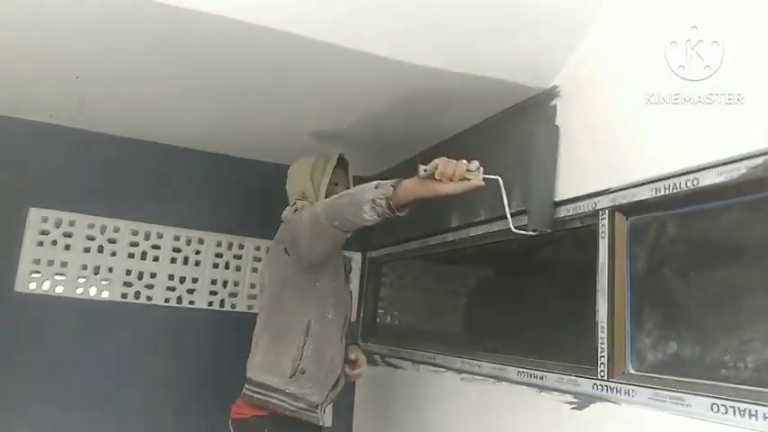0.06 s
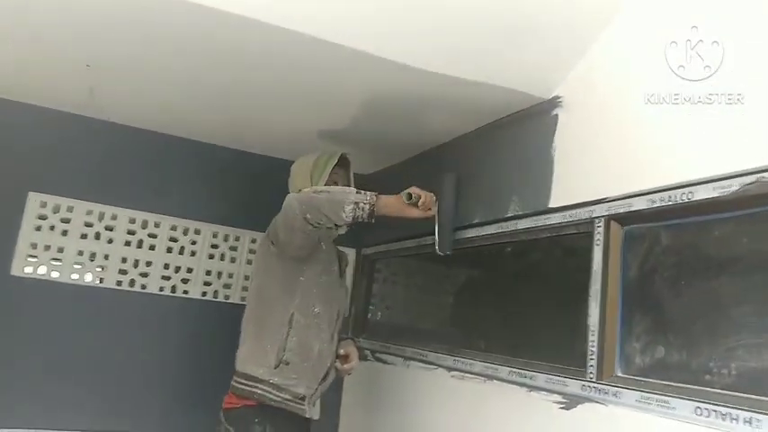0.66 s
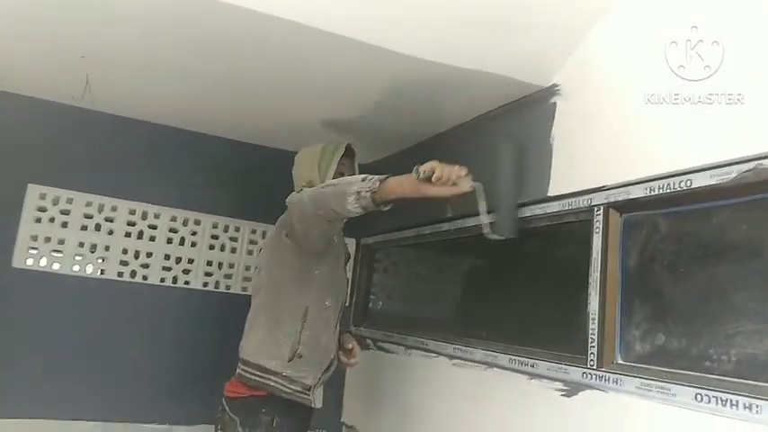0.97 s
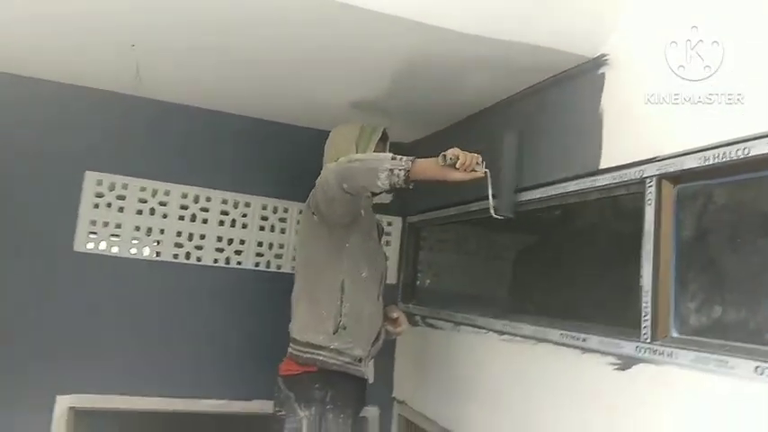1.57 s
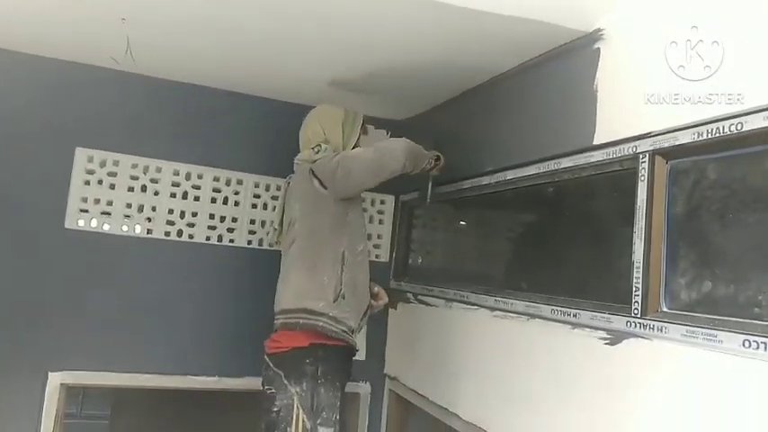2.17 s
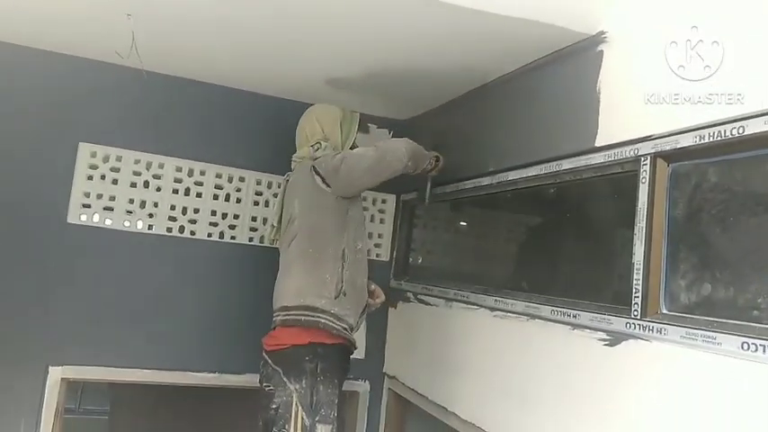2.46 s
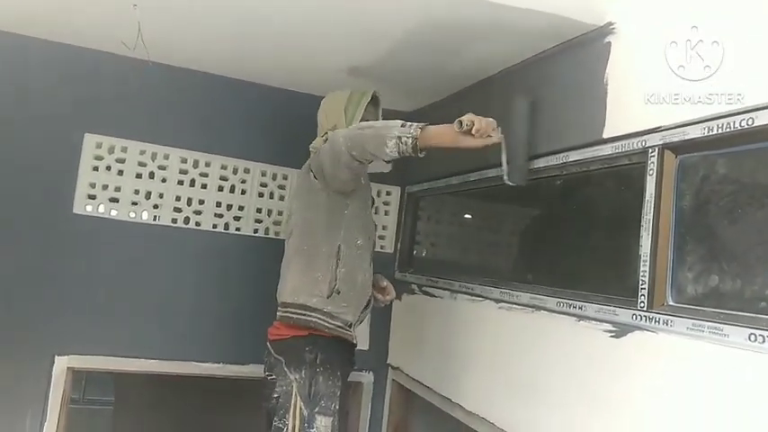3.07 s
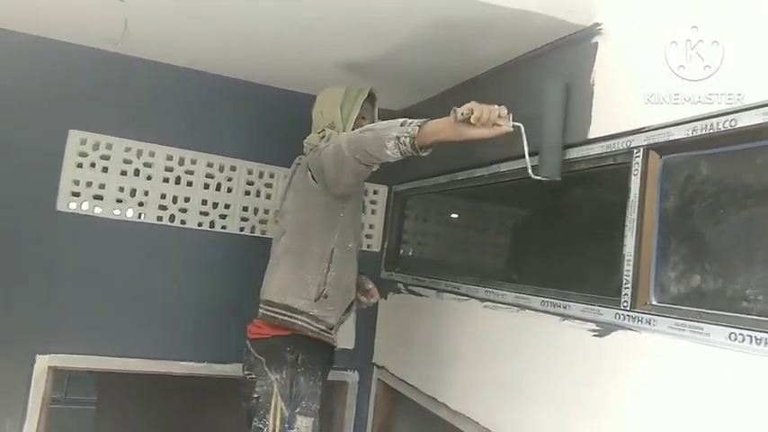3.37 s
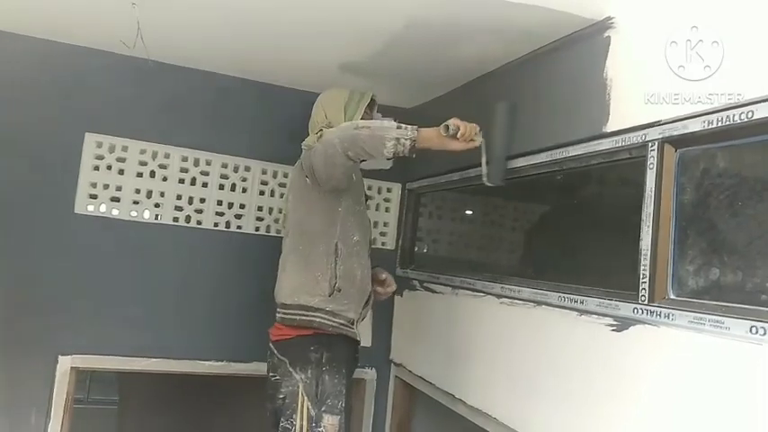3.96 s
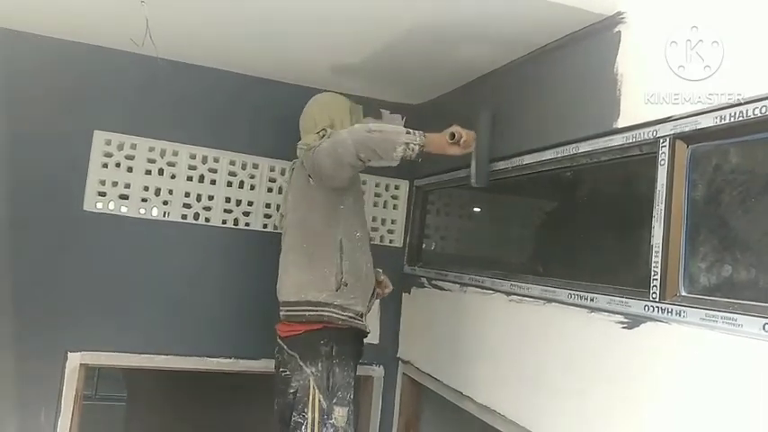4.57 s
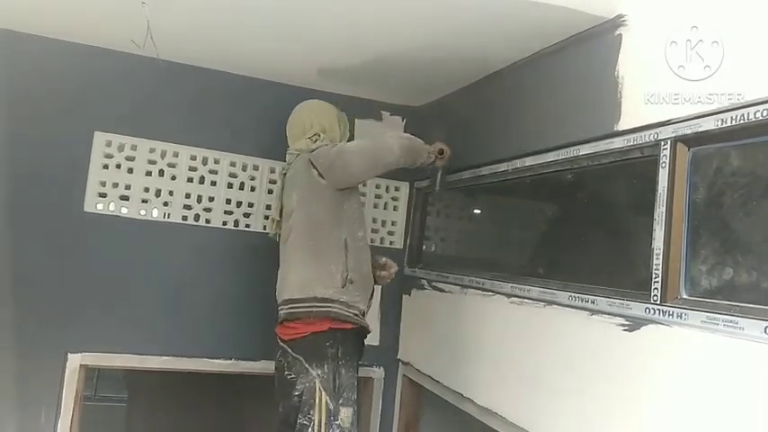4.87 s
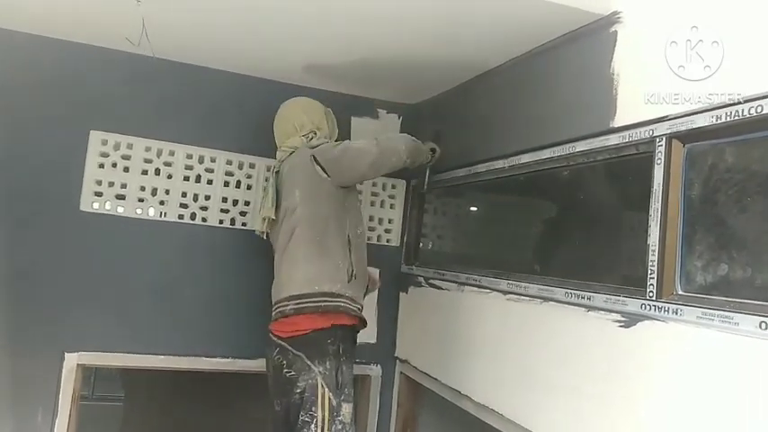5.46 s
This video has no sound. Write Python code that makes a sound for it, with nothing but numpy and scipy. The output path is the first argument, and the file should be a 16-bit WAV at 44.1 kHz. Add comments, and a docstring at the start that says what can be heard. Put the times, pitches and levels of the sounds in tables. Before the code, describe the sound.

A paint roller runs back and forth on a wall, heard from a few metres away in an empty, reverberant room. After a light start with a small metallic scrape and a soft rub, the strokes turn firm and quick, each swelling with a wet, rasping hiss. A faint rumble lies underneath, and distant dull thuds resound through the building, strongest just past halfway and at the close.

```python
"""Over a low rumble, a wet paint roller starts lightly on the wall of a bare, echoing room, a few metres away.
Its wire frame scrapes once and rings, and a slow stroke drags with a soft rub. From about 1 s the strokes
are firm: threads of paint snap off the nap in a dense crackling hiss that swells with the roller's speed.
Meanwhile dull knocks from elsewhere excite the building's resonances, booming most near 3.2 s and at the end."""
import sys
import numpy as np
from scipy import signal
from scipy.fft import rfft, irfft
from scipy.io import wavfile
from scipy.ndimage import uniform_filter1d

SR = 44100
rng = np.random.default_rng(int(sys.argv[2]) if len(sys.argv) > 2 else 0)


def transcribe(signal):
    """Save signal, clipped to [-1, 1], as a 16-bit WAV file at the path in sys.argv[1]."""
    frames = np.atleast_2d(signal).T
    limited = np.clip(frames, -1, 1)
    pcm = np.round(limited * 32767).astype(np.int16)
    wavfile.write(sys.argv[1], SR, pcm)


N = 247842
T = np.arange(N) / SR
HZ = np.maximum(np.arange(N // 2 + 1) * SR / N, 1)
TOP_HZ = 14300
# the paint's hiss, rasp and fizz: (exponent of speed in the power [1], reverberation time [s])
PAINT_BANDS = [(1.27, 0.42), (0.56, 0.39), (1.66, 0.25)]


def undb(db):
    """Amplitude ratio of a level in decibels."""
    return 10 ** (np.asarray(db) / 20)


def unit(x):
    """Normalisation to rms 1."""
    return x / np.sqrt(np.mean(x ** 2))


def across(points):
    """Interpolation of (frequency, level) points on a logarithmic frequency axis."""
    hz, db = np.transpose(points)
    return np.interp(np.log(HZ), np.log(hz), db)


def shape(x, gain):
    """Filtering as multiplication of the spectrum."""
    return irfft(rfft(x) * gain, N)


def resonate(x, hz, width_hz):
    """Two-pole resonance with gain 1 at its centre."""
    return signal.lfilter(*signal.iirpeak(hz, hz / width_hz, fs=SR), x)


def walk(per_s):
    """Random modulation: held values smoothed by two moving averages."""
    hold = int(SR / per_s)
    steps = np.repeat(rng.standard_normal(N // hold + 1), hold)
    return unit(uniform_filter1d(uniform_filter1d(steps, hold), hold)[:N])


def diffuse(blend_hz=750):
    """Diffuse field: noise coherent between the ears in the bass, incoherent in the treble."""
    mid, side = rng.standard_normal((2, N))
    coherence = .93 / (1 + (HZ / blend_hz) ** 4)
    left_right = np.array([[1], [-1]])
    return shape(mid, np.sqrt(1 + coherence)) + left_right * shape(side, np.sqrt(1 - coherence))


def room(power, t60):
    """Reverberation: energy accumulates between the walls and decays exponentially."""
    keep = np.exp(-np.log(1e6) / (t60 * SR))
    return signal.lfilter([1 - keep], [1, -keep], power)


def roller(rasp_hz=4300, fizz_hz=10200, direct_db=-9, patchy_db=0.81, trim_db=-1.0, lag_samples=18):
    """Direct and reverberant sound: the crackle of the peeling nap arrives mostly by way of the walls."""
    # spectrum of tearing paint: (frequency [Hz], relative spectral level [dB])
    tearing = [(300, -29), (700, -29), (1200, -21), (1600, -18), (2100, -11), (2600, -7), (3150, -5),
               (4100, -4.5), (5500, -2), (6700, 1.04), (8100, 0.5), (9300, -3.5), (11500, -7.5),
               (14000, -13.5)]
    # excess of the left ear over the right: (frequency [Hz], level difference [dB])
    left_excess = [(500, 0), (1300, 2.5), (3100, 5), (5000, 2), (6600, -.3), (9500, 6.5), (14000, 7.5)]
    crackle = snaps(per_s=7000, spread_db=-1.0)
    direct = rfft(np.array([np.pad(crackle, (lag_samples, 0))[:N], crackle]))  # right ear leads
    # threads snap in clusters; the roller is long and moving, so its echoes never repeat
    clusters = undb(0.61 * walk(700))
    scattered = rfft(clusters * np.array([snaps(per_s=30000, spread_db=1.5) for _ in range(2)]))
    rasp = 1 / (1 + (HZ / rasp_hz) ** 8)
    fizz = 1 / (1 + (fizz_hz / HZ) ** 14)
    hiss = 1 - rasp - fizz
    paint = undb(across(tearing) + np.array([[.5], [-.5]]) * across(left_excess)) * (HZ < TOP_HZ)
    out = 0
    for band, power, (_, t60) in zip((hiss, rasp, fizz), stroke_power(), PAINT_BANDS):
        colour = unit(paint * band)
        heard = irfft(scattered * colour, N) * np.sqrt(room(power, t60))
        heard += irfft(direct * colour, N) * np.sqrt(power) * undb(direct_db)
        out += heard * undb(trim_db + patchy_db * walk(28))  # wetter and drier patches shift the colour
    return out


def snaps(per_s, spread_db):
    """Shot noise: each breaking thread of paint is an impulse of random time, size and sign."""
    size = undb(spread_db * np.minimum(rng.standard_exponential(N), 7))
    return unit((rng.random(N) < per_s / SR) * size * rng.choice([-1, 1], N))


def stroke_power(last_turn_s=5.587, overlap_s=0.01, first_rest_s=0.11, firm_db=-41):
    """Power law: hiss, rasp and fizz follow the roller's speed between turns; light strokes are raspier."""
    # strokes of the arm: (start time [s], relative level [dB])
    strokes = [(-0.1, -56.5), (0.261, -57.5), (0.825, -51), (1.123, -41.5), (1.501, -41), (1.75, -42),
               (2.108, -43.5), (2.395, -41.7), (2.61, -42), (2.852, -41), (3.118, -40), (3.415, -40.5),
               (3.768, -40.5), (3.992, -39), (4.297, -39.5), (4.52, -39.5), (4.816, -40.5), (5.006, -41.8),
               (5.22, -42.5), (5.408, -41.2)]
    starts, levels_db = np.transpose(strokes)
    ends = np.append(starts[1:], last_turn_s) + overlap_s  # the nap peels on just after each turn
    ends[0] -= first_rest_s
    exponents = np.array(PAINT_BANDS)[:, :1]
    peeling = np.zeros((3, N))
    for start, end in zip(starts, ends):
        during = (T > start) & (T < end)
        fastest = start + 0.053 + 0.24 * (end - start)
        speed = np.sin(np.interp(T[during], [start, fastest, end], [0, np.pi / 2, 0]))
        peeling[:, during] += speed ** exponents
    hiss_db = np.interp(T, (starts + ends) / 2, levels_db)  # hand pressure glides between strokes
    lightness_db = firm_db - hiss_db
    rasp_db = hiss_db - 9.5 + 0.34 * lightness_db
    fizz_db = hiss_db - 8.2 + 0.06 * lightness_db
    return peeling * undb([hiss_db, rasp_db, fizz_db]) ** 2


def skid(start=0.61, end=.85, db=-55.0, hz=2550, width_hz=2300):
    """Sliding friction: a light, slow stroke drags instead of rolling and gives a soft, dull rub."""
    push = np.abs(np.sin(np.pi * np.clip((T - start) / (end - start), 0, 1)))
    friction = rng.standard_normal((2, N))
    rub = resonate(resonate(friction, hz, width_hz), hz, width_hz)
    return unit(rub) * undb(db) * np.sqrt(room(push, t60=0.34))


def early_reflections(x, sway_s=0.000304):
    """Comb filtering: echoes interfere with the hiss, and the notches drift as the roller travels."""
    # echoes off the ceiling and the corner: (nominal delay [s], gain [dB])
    echoes = [(.0017, -16), (.0034, -14), (.0061, -13.5), (.0097, -16)]
    out = x.copy()
    for delay, db in echoes:
        for ear in range(2):
            lag = delay * rng.uniform(.8, 1.2) + sway_s * walk(2.5)
            out[ear] += undb(db) * np.interp(T - lag, T, x[ear])
    return out * np.sqrt(np.mean(x ** 2) / np.mean(out ** 2))


def frame_scrape(start=0.377, scrape_db=-53, ring_db=-56):
    """Damped resonance: friction briefly excites the wire frame, whose narrow ring outlasts the scrape."""
    grip = np.clip((T - start) / .01, 0, 1)
    since_release = np.maximum(T - start - .033, 0)
    scrape = unit(resonate(rng.standard_normal((2, N)), hz=7400, width_hz=3200))
    scrape *= np.exp(-since_release / .025)
    ring = unit(resonate(rng.standard_normal((2, N)), hz=7750, width_hz=250))
    ring *= np.exp(-since_release / .065)
    return grip * (undb(scrape_db) * scrape + undb(ring_db) * ring)


def knocks(gain_db=13, build_t60=0.037):
    """Modal decay: far blows arrive as reverberation only, each mode building up and dying at its own rate."""
    # far blows: (time [s], relative level [dB], strongest frequency [Hz], fall to each side [dB/octave])
    impacts = [(1.083, -55.5, 700, 5), (1.2, -57, 710, 8), (2.03, -61.5, 245, 15), (2.869, -55, 378, 6),
               (3.177, -43, 196, 5.5), (3.245, -50, 270, 3.5), (3.52, -54, 205, 6),
               (5.57, -43.5, 125, 12.5)]
    # resonances of the building: (frequency [Hz], bandwidth [Hz], gain [dB], reverberation time [s])
    modes = [(88.5, 13, -1, 0.56), (138, 23, 1, 0.67), (179, 24, 1, 1.5), (219, 29, 0, 2.4),
             (258, 28, 3, 1.05), (363, 46, -4, 1.55), (557, 50, -1.5, 1.9), (792, 57, -1, 1.7),
             (1100, 250, 1, 1.33), (1320, 210, -14, 0.95)]
    times, levels_db, centre_hz, fall_db = np.transpose(impacts)
    onsets = np.minimum(times * SR, N - 1).astype(int)
    field, out = diffuse(), 0
    for hz, width_hz, mode_db, t60 in modes:
        blows = np.zeros(N)
        blows[onsets] = undb(levels_db - fall_db * np.abs(np.log2(hz / centre_hz))) ** 2
        energy = room(room(blows, build_t60), t60) * t60 * SR / np.log(1e6)
        boom = resonate(field * np.sqrt(energy), hz, width_hz)
        out += undb(gain_db + mode_db) * resonate(boom, hz, 3 * width_hz)
    return out


def background(rumble_db=-64.5):
    """Continuous and line spectra: a gently swaying rumble, and faint hums wandering in level and pitch."""
    # spectrum of the rumble: (frequency [Hz], relative spectral level [dB])
    rumble_spectrum = [(20, -3.5), (31, 1), (42, -7), (50, -15), (63, 1.5), (73, -2.5), (84, -14),
                       (105, -8), (140, -11), (230, -12.5), (380, -13.5), (590, -12), (1900, -12.5),
                       (14000, -24.5)]
    # faint tones in the room: (frequency [Hz], level [dB])
    tones = [(31, -73.5), (61, -76), (98, -83.5), (157, -86), (248, -95), (550, -88.5)]
    sway = undb(.7 * walk(3))
    out = unit(shape(diffuse(), undb(across(rumble_spectrum)))) * undb(rumble_db) * sway
    for hz, db in tones:
        amplitude = undb(db + 3.5 * walk(2.13))
        phase = 2 * np.pi * np.cumsum(hz + 2.5 * walk(9)) / SR
        out += amplitude * np.sin(phase)
    return out


def scene():
    """Superposition of roller, frame, far knocks and background."""
    return early_reflections(roller() + skid()) + frame_scrape() + knocks() + background()


def record(dry):
    """Band limiting: an elliptic low-pass cuts the top treble steeply."""
    return signal.sosfilt(signal.ellip(12, .1, 80, TOP_HZ, fs=SR, output="sos"), dry)


dry = scene()
out = record(dry)
transcribe(out)
```